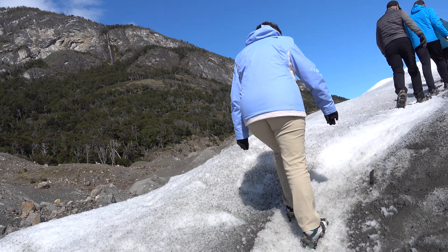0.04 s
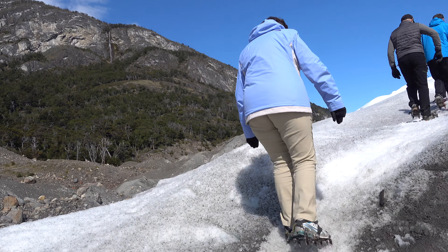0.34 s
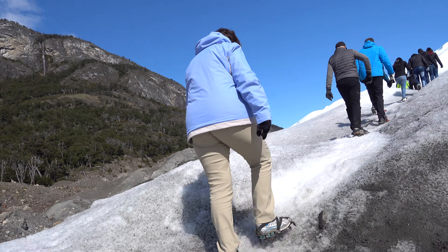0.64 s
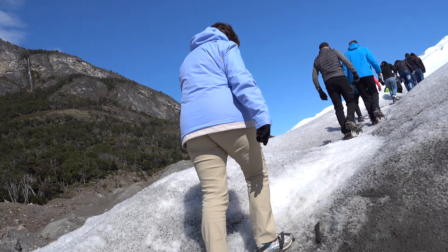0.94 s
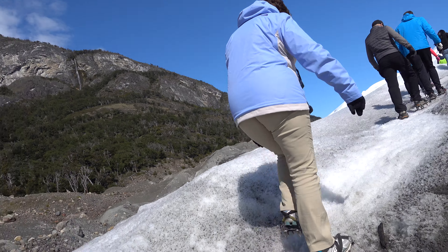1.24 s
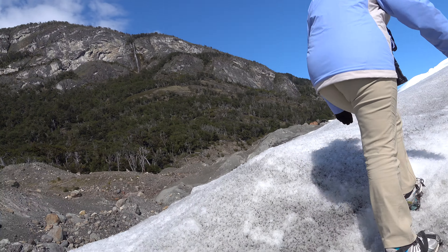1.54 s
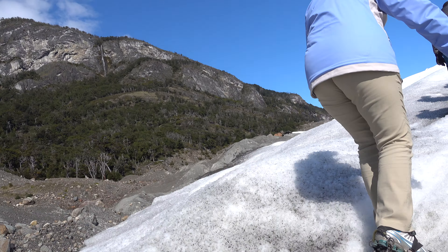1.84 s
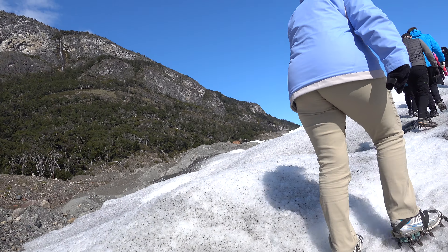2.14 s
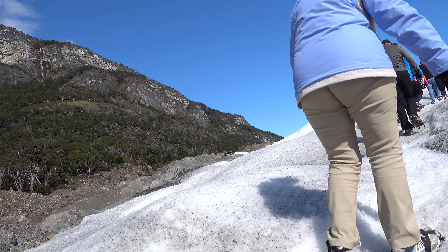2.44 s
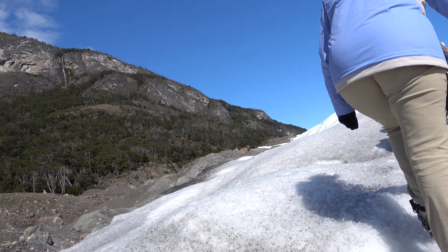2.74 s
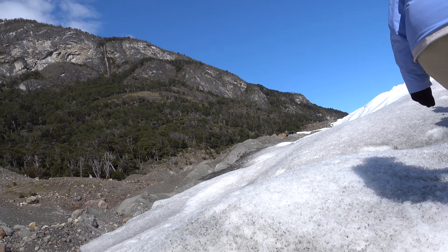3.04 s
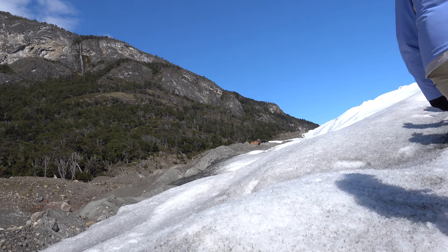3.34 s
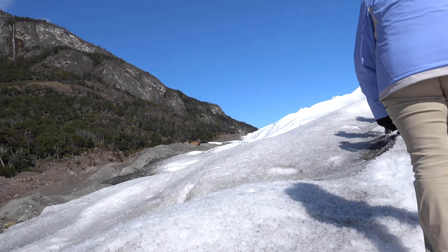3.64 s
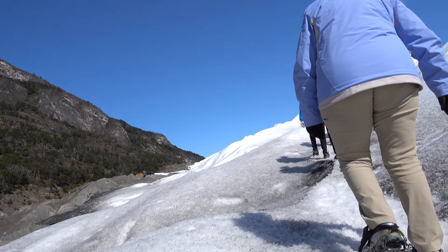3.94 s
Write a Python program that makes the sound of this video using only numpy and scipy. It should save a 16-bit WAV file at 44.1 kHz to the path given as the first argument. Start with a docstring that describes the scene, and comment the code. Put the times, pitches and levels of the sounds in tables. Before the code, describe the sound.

Crunching, scuffing steps of spiked boots climbing an icy slope, with fainter footsteps farther off.

```python
"""Crampons on glacier ice

Walkers climb a slope of coarse ice, close by on the right of a microphone pair in the open air.
Each step is a cluster of spike bites (a dull knock, a crunch, a fizz of crystals) within longer
scuffs of loose grains. Now and then the crust snaps, hollow ice thuds and the steel sings or jingles.
Farther off, the rest of the party patters over a soft hiss of air."""
import sys
import numpy as np
from scipy import signal
from scipy.fft import rfft, irfft
from scipy.io import wavfile
from scipy.ndimage import uniform_filter1d

SR = 44100
rng = np.random.default_rng(int(sys.argv[2]) if len(sys.argv) > 2 else 0)


def store_wav(level_fs):
    """Save 16-bit WAV to argv[1]."""
    pcm = np.round(np.clip(np.atleast_2d(level_fs), -1, 1) * 32767)
    wavfile.write(sys.argv[1], SR, pcm.T.astype(np.int16))


N = 176400

# open air around the microphones: (time [s], level [dB])
AIR_LEVEL = [(0, -45.5), (.55, -47.5), (.75, -44.5), (1.33, -46.5), (1.449, -43), (1.9, -43.5),
             (2.3, -46.5), (2.72, -45.5), (3.35, -43), (3.55, -39), (3.7, -43.5), (4, -39.5)]
# spikes biting the ice close by, levels before each layer's trim:
# (peak time [s], rise [s], decay [s], knock [dB], crunch [dB], fizz [dB], knock pitch [Hz])
BITES = [(0.0479, 0.0073, 0.012, -37.5, -36, -36.5, 630), (0.055, 0.009, 0.011, -39, -49, -44, 640),
         (0.078, 0.0035, 0.0061, -53, -46, -34, 711), (0.1062, 0.0022, 0.0033, -33, -45, -49.4, 730),
         (0.1882, 0.0024, 0.0041, -21, -35, -37, 745), (0.2968, 0.0015, 0.0068, -25.5, -31.5, -36, 635),
         (0.354, 0.0028, 0.0049, -35, -45, -55, 732), (0.372, 0.0074, 0.013, -50, -40.5, -44.5, 785),
         (0.4998, 0.0011, 0.002, -53, -38, -36.5, 480), (0.8766, 0.0097, 0.015, -27, -33.5, -32, 920),
         (0.886, 0.0023, 0.013, -57, -36, -34, 808), (0.926, 0.0047, 0.006, -26, -35, -46, 730),
         (0.9526, 0.0059, 0.0085, -26.5, -28.5, -26.5, 495), (0.963, 0.0076, 0.011, -54, -35, -27, 493),
         (0.985, 0.0027, 0.0041, -32.5, -44, -61, 735), (1.0141, 0.0013, 0.0026, -21, -44, -39, 700),
         (1.0275, 0.0059, 0.0067, -36, -41, -42, 900), (1.085, 0.0022, 0.0074, -32, -65, -34, 685),
         (1.103, 0.0085, 0.0076, -23.5, -27.5, -27.5, 790), (1.163, 0.0027, 0.025, -56, -44.5, -38.5, 694),
         (1.1862, 0.0019, 0.0044, -57, -30.5, -30, 723), (1.2465, 0.0052, 0.019, -56, -50, -39.5, 616),
         (1.469, 0.004, 0.0062, -33.5, -41.5, -44, 690), (1.481, 0.0019, 0.0024, -29.5, -48, -90, 775),
         (1.595, 0.0056, 0.004, -29, -29, -39, 530), (1.6134, 0.01, 0.0038, -30, -31, -33, 690),
         (1.7123, 0.0009, 0.0044, -27, -27, -29, 550), (1.7345, 0.01, 0.014, -43, -38.5, -44, 484),
         (2.005, 0.0027, 0.002, -58, -39, -39, 513), (2.121, 0.0019, 0.0025, -38.5, -55, -51.5, 722),
         (2.396, 0.0022, 0.0049, -31, -53, -31, 1010), (2.4067, 0.001, 0.0022, -45, -28.5, -26, 769),
         (2.4436, 0.0049, 0.0094, -34, -52, -41.5, 606), (2.5215, 0.0058, 0.005, -23.5, -34, -39, 735),
         (2.528, 0.0022, 0.012, -44, -45, -37, 620), (2.5668, 0.0072, 0.011, -31.5, -39.5, -38.5, 575),
         (2.5927, 0.0064, 0.038, -60, -49, -42.5, 577), (2.8992, 0.0087, 0.014, -36.5, -34, -29, 690),
         (2.97, 0.0027, 0.0049, -32, -43, -31.5, 500), (3.0166, 0.0025, 0.031, -38, -37.5, -42, 940),
         (3.069, 0.0039, 0.0076, -60, -30, -38, 892), (3.082, 0.0034, 0.0068, -28, -31, -33, 630),
         (3.0987, 0.0067, 0.0024, -32, -31, -35, 666), (3.208, 0.0067, 0.0068, -31, -31.5, -31.5, 750),
         (3.475, 0.008, 0.02, -39, -49, -43, 510), (3.75, 0.0098, 0.014, -33.5, -32, -29.5, 600),
         (3.817, 0.0054, 0.019, -39, -38, -40.5, 990), (3.9728, 0.0052, 0.0054, -25, -31.9, -37, 657)]
# hollow ice under a boot: (time [s], pitch [Hz], level [dB])
THUDS = [(.048, 773, -26), (0.465, 467, -41), (0.493, 478, -35), (.573, 507, -44), (.68, 422, -42.5),
         (.923, 383, -31.5), (.949, 329, -22.5), (1.1, 218, -24), (1.099, 753, -21), (1.599, 343, -29.5),
         (1.715, 208, -33), (1.902, 760, -41), (1.984, 348, -38.5), (2.095, 387, -39), (2.287, 243, -36),
         (2.522, 515, -26), (2.908, 290, -33), (2.967, 1870, -33.5), (3.206, 970, -28), (3.473, 238, -34.5),
         (3.636, 251, -36), (3.749, 350, -31), (3.973, 343, -27.5)]
# boots dragging through loose grains, levels before each layer's trim:
# (peak time [s], rise [s], decay [s], body [dB], crunch [dB], fizz [dB])
SCUFFS = [(0.0894, 0.049, 0.074, -46.5, -37, -36), (0.1897, 0.027, 0.02, -40, -35.5, -37),
          (0.2472, 0.017, 0.026, -40, -40.5, -43), (0.3024, 0.03, 0.11, -46.5, -44, -42.5),
          (0.628, 0.031, 0.024, -49, -53, -47.5), (0.857, 0.12, 0.35, -54, -44, -37),
          (1.406, 0.031, 0.024, -49, -56, -41.5), (1.5513, 0.093, 0.019, -52.5, -45, -36),
          (1.586, 0.04, 0.033, -38, -35, -35.5), (1.7424, 0.091, 0.28, -61, -45, -43),
          (1.9123, 0.016, 0.15, -74, -59, -45), (2.1026, 0.028, 0.36, -52, -53, -44),
          (2.259, 0.037, 0.0071, -45, -34, -29), (2.291, 0.0097, 0.031, -44.5, -39.5, -32),
          (2.4055, 0.041, 0.075, -44, -40, -37), (2.8842, 0.067, 0.057, -44, -44.5, -37.5),
          (3.0526, 0.048, 0.25, -54.5, -43, -40), (3.6, 0.032, 0.019, -46, -42, -30),
          (3.6373, 0.029, 0.04, -51, -41, -38), (3.858, 0.0061, 0.039, -43, -34, -32.5),
          (3.8996, 0.0073, 0.015, -37.5, -42, -41)]
# spikes rasping through hard crust: (peak time [s], rise [s], decay [s], level [dB])
RASPS = [(.14, 0.017, .02, -44.5), (2.407, 0.0043, 0.008, -27.5), (3.07, 0.026, 0.013, -41),
         (3.61, 0.021, 0.018, -50), (3.825, 0.012, 0.0036, -37.5), (3.858, 0.0027, 0.035, -33.5)]
# dragged spikes singing: (peak time [s], pitch [Hz], level [dB])
SQUEALS = [(.12, 11300, -47), (.205, 8150, -46), (1.02, 1114, -42), (1.395, 12250, -49),
           (1.54, 10000, -39.5), (2.29, 8720, -39.5), (3.65, 7650, -42.5)]
# the crust breaking under a spike: (time [s], pitch [Hz], level [dB])
SNAPS = [(.187, 1000, -21.5), (.2975, 2600, -27), (.4918, 9000, -14.5), (1.1035, 2980, -20),
         (1.1862, 3600, -16), (1.597, 2000, -12), (1.712, 2420, -15), (2.3958, 3500, -15),
         (2.4055, 3400, -17), (2.526, 1200, -22)]
# loose chips of ice ticking: (time [s], pitch [Hz], level [dB])
CHIPS = [(0.513, 3500, -41), (0.547, 4200, -38), (.826, 10000, -25), (.835, 11000, -24),
         (1.63, 4900, -27.5), (2.547, 1010, -33), (2.595, 2020, -30), (3.038, 2500, -26)]
# steel spikes and links jingling: (time [s], pitch [Hz], level [dB])
JINGLES = [(.961, 14500, -25), (1.108, 11650, -30), (1.184, 11340, -40), (1.387, 12300, -42),
           (1.413, 12570, -32.5), (2.002, 12450, -38), (2.843, 13200, -36), (3.097, 11400, -24)]

# hiss of the open glacier: (frequency [Hz], level [dB])
AIR_SPECTRUM = [(60, -55), (110, -38), (200, -5.5), (330, -2.5), (520, 1.5), (850, -3), (1300, -4),
                (2100, -1), (3500, -4.5), (6000, -5.5), (10000, -4.5), (16000, -6.5)]
# ice knocked by a spike: (frequency [ratio to the pitch], level [dB])
KNOCK_SPECTRUM = [(.02, -65), (.06, -56), (.13, -25), (.25, -8.5), (.45, -3), (.75, -0.5), (1.08, 3),
                  (1.55, 0.5), (2.2, -5), (4, -22), (12, -47)]
# crust being crushed: (frequency [Hz], level [dB])
CRUNCH_SPECTRUM = [(100, -39.5), (600, -8), (1100, -6), (1500, -3.5), (2100, 2), (3000, -1.5), (4000, -4.5),
                   (5200, -6.5), (8000, -25), (16000, -44)]
# crystals shattering: (frequency [Hz], level [dB])
FIZZ_SPECTRUM = [(300, -15.5), (2500, -17.5), (4500, 0.5), (6000, -3.5), (7400, -3), (9200, 0),
                 (11500, 3.5), (13500, 2), (16000, -0.5)]
# modes of the steel crampon frame: (frequency [Hz], relative level [dB])
FRAME_MODES = [(3920, -5.5), (5530, -21), (7370, 0), (8200, 1.5), (8800, -1), (9270, 2.5), (9830, 3),
               (10350, 3.5), (11330, 2.5), (12490, 1.5), (14480, -2)]
# low grinding under the sole: (frequency [Hz], level [dB])
BODY_SPECTRUM = [(30, -41), (80, -47), (150, -10.5), (250, -3), (380, 0), (560, -1.5), (780, -1),
                 (1200, -4), (2000, -20.5), (6000, -35)]
# hard crust scraped by a spike: (frequency [Hz], level [dB])
RASP_SPECTRUM = [(300, -17), (900, -9.5), (1700, -4), (2300, -4.5), (3100, 0), (3700, -12), (5500, -33),
                 (12000, -42)]

# shading of the left microphone: (frequency [Hz], left minus right [dB])
LEFT_SHADE = [(200, -0.5), (400, -1), (1000, -4.5), (1600, -6.5), (2800, -8.5), (4000, -9.5), (5000, -14.5),
              (7000, -16), (11000, -16.5), (16000, -19.5)]
# likeness of the two microphones: (frequency [Hz], coherence [0 to 1])
COHERENCE = [(700, 1), (1400, 0.92), (3400, 0.86), (4300, 0.19), (6500, 0.47), (10000, 0.21), (16000, .3)]
# phase between the microphones: (frequency [Hz], left lead [rad])
LEFT_LEAD = [(40, .1), (170, 0.43), (420, 0.85), (700, 1.24), (1500, 1.41), (3600, 1.13), (6400, 1.9),
             (9500, 5.9), (15000, 1.2)]
# treble swaying on the left microphone: (time [s], gain [dB])
TREBLE_SWAY = [(0, -2.5), (.2, 1.5), (.4, 0), (0.752, -2), (1.02, 3), (1.37, 0), (1.6, 2.5), (2.25, -2),
               (2.5, 2), (2.85, -1), (3.1, 2.5), (3.7, -2), (4, 2.5)]


def amp(db):
    """Decibels to gain."""
    return 10 ** (np.asarray(db) / 20)


def unit_rms(x):
    """Scales each row to an rms of one."""
    return x / np.sqrt(np.mean(x ** 2, -1, keepdims=True) + 1e-20)


def read(points, hz):
    """Reads a table along a log-frequency axis."""
    freqs, values = np.transpose(points)
    return np.interp(np.log(hz + 1e-6), np.log(freqs), values)


def fader(points):
    """Gain at every sample from a table of times and decibels."""
    return amp(np.interp(np.arange(N) / SR, *np.transpose(points)))


def add(mix, s, sound):
    """Adds a two-row sound to the mix at time s."""
    at = round(s * SR)
    sound = sound[:, max(-at, 0):]
    part = mix[:, max(at, 0):][:, :sound.shape[1]]
    part += sound[:, :part.shape[1]]


def colour(points, pitch=1, size=4096):
    """Minimum-phase impulse response with the given spectrum, its axis multiplied by pitch."""
    hz = abs(np.fft.fftfreq(size, 1 / SR))
    log_gain = np.log(amp(read(points, hz / pitch)))
    spectrum = np.exp(np.conj(signal.hilbert(log_gain)))
    return np.fft.ifft(spectrum).real[:size // 2]


def ring(hz, width_hz, size=2048):
    """Impulse response of one damped mode."""
    t = np.arange(size) / SR
    return np.exp(-np.pi * width_hz * t) * np.sin(2 * np.pi * hz * t)


def fractures(per_s, spread_db, dust):
    """Tiny cracks of uneven size over a dust of finer ones, in two uncorrelated rows."""
    sizes = amp(spread_db * np.minimum(rng.exponential(1, N), 3))
    breaks = rng.random(N) < per_s / SR
    cracks = sizes * breaks * rng.uniform(-1, 1, (2, N))
    return unit_rms(cracks) + dust * rng.standard_normal((2, N))


def swell(cracks, response, s, rise, decay, db, attack_curve=1.73):
    """Cracks swelling to a peak at s and dying away, heard through a response: (start time, sound)."""
    t = np.arange(-2 * rise, min(5 * decay, 1), 1 / SR)
    envelope = np.exp(np.where(t < 0, -abs(t / rise) ** attack_curve, -t / decay))
    start = s + t[0]
    drive = np.take(cracks, round(start * SR) + np.arange(len(t)), axis=1, mode="wrap") * envelope
    sound = signal.fftconvolve(drive, response[None], axes=1)
    return start, amp(db) * sound * np.linalg.norm(envelope) / np.linalg.norm(sound, axis=1)[:, None]


def air():
    """Soft, slightly gritty hiss of the open glacier."""
    grit = fractures(per_s=1200, spread_db=2.5, dust=1.36)
    hiss = signal.oaconvolve(grit, colour(AIR_SPECTRUM)[None], axes=1)[:, :N]
    return unit_rms(hiss) * fader(AIR_LEVEL)


def far_steps(per_s=20, centre_hz=430, q=1.7, mean_db=-49.5, spread_db=9):
    """The rest of the party, farther off: dull, irregular knocks."""
    out, cracks = np.zeros((2, N)), fractures(per_s=4500, spread_db=4, dust=0.86)
    for k, (jitter, weight, pitch) in enumerate(rng.uniform(-1, 1, (160, 3))):
        s = (k + jitter) / per_s
        if s < N / SR:
            hz = centre_hz * 1.4 ** pitch
            knock = np.diff(ring(hz, hz / q))
            db = mean_db + spread_db * weight
            add(out, *swell(cracks, knock, s, rise=0.0011, decay=0.0064, db=db))
    return out


def clumping(depth_db, samples):
    """Quick random swings of gain as grains give way in groups."""
    drift = uniform_filter1d(uniform_filter1d(rng.standard_normal(N), samples), samples)
    return amp(depth_db * unit_rms(drift))


def splinters(per_s=650, low_hz=1100, high_hz=7000, pitches=14, q=8, db=-5):
    """Larger grains crack one by one, each ringing for a few cycles at its own pitch."""
    out = np.zeros((2, N))
    for hz in np.geomspace(low_hz, high_hz, pitches):
        cracks = fractures(per_s / pitches, spread_db=2, dust=0)
        out += signal.oaconvolve(cracks, hz * ring(hz, hz / q)[None], axes=1)[:, :N]
    return amp(db) * unit_rms(out)


def crystals(frame_db=-4.5, spread_db=4.5, detune=0.02):
    """Response of shattering crystals plus the steel frame, which rings differently at each contact."""
    contact = rng.uniform(-1, 1, (len(FRAME_MODES), 2))
    frame = sum(amp(db + spread_db * force) * ring(hz * (1 + detune * shift), width_hz=150)
                for (hz, db), (force, shift) in zip(FRAME_MODES, contact))
    return unit_rms(colour(FIZZ_SPECTRUM)) + amp(frame_db) * unit_rms(frame)


def bites(knock_trim_db=1, crunch_trim_db=1.5, fizz_trim_db=4):
    """Spikes punch in close by: the ice knocks, its crust crunches and crystals shatter."""
    out, crunch = np.zeros((2, N)), colour(CRUNCH_SPECTRUM)
    deep = fractures(per_s=3000, spread_db=1.5, dust=0.67)
    coarse = fractures(per_s=4000, spread_db=4, dust=0.52)
    fine = fractures(per_s=7000, spread_db=4, dust=0.6)
    clumps = clumping(depth_db=1, samples=90)
    coarse = unit_rms(coarse * clumps) + splinters()
    fine *= clumps
    for s, rise, decay, knock_db, crunch_db, fizz_db, hz in BITES:
        add(out, *swell(deep, colour(KNOCK_SPECTRUM, hz), s, rise, decay, knock_db + knock_trim_db))
        add(out, *swell(coarse, crunch, s, rise, decay, crunch_db + crunch_trim_db))
        add(out, *swell(fine, crystals(), s, rise, decay, fizz_db + fizz_trim_db))
    return out


def thuds(rise_cycles=0.5, decay_s=0.0057):
    """A boot's weight sets one mode of the hollow ice ringing."""
    out, t = np.zeros((2, N)), np.arange(SR // 12) / SR
    for s, hz, db in THUDS:
        envelope = 2 * (1 - np.exp(-t * hz / rise_cycles)) * np.exp(-t / decay_s)
        phase = 2 * np.pi * (hz * t + rng.random((2, 1)))
        add(out, s, amp(db) * envelope * np.sin(phase))
    return out


def scuffs(body_trim_db=2, crunch_trim_db=-1, fizz_trim_db=1.5):
    """Loose grains grind under the sole in clumps and skitter away; dragged spikes rasp."""
    out, body, crunch = np.zeros((2, N)), colour(BODY_SPECTRUM), colour(CRUNCH_SPECTRUM)
    clumps = clumping(depth_db=2.6, samples=130)
    deep = fractures(per_s=500, spread_db=5, dust=0.63)
    coarse = fractures(per_s=1700, spread_db=2, dust=1.37) * clumps
    fine = fractures(per_s=3200, spread_db=3, dust=0.97) * clumps
    coarse = unit_rms(coarse) + splinters()
    for s, rise, decay, body_db, crunch_db, fizz_db in SCUFFS:
        add(out, *swell(deep, body, s, rise, decay, body_db + body_trim_db))
        add(out, *swell(coarse, crunch, s, rise, decay, crunch_db + crunch_trim_db))
        add(out, *swell(fine, crystals(), s, rise, decay, fizz_db + fizz_trim_db))
    for s, rise, decay, db in RASPS:
        add(out, *swell(coarse, colour(RASP_SPECTRUM), s, rise, decay, db))
    return out


def squeals(chatter):
    """A dragged spike chatters and sings in one narrow mode."""
    out = np.zeros((2, N))
    for s, hz, db in SQUEALS:
        add(out, *swell(chatter, ring(hz, width_hz=110), s, rise=0.049, decay=0.046, db=db))
    return out


def snaps(q=1.1, spray_db=-18, spray_decay_s=0.0011):
    """The crust gives way at once: one sharp crack and a brief spray of splinters."""
    out, t = np.zeros((2, N)), np.arange(SR // 100) / SR
    for s, hz, db in SNAPS:
        crack = np.diff(ring(hz, hz / q))
        crack /= abs(crack).max()
        spray = amp(spray_db) * rng.standard_normal((2, len(t))) * np.exp(-t / spray_decay_s)
        add(out, s, amp(db) * signal.fftconvolve((t == 0) + spray, crack[None], axes=1))
    return out


def chips(chatter, q=4):
    """Loose chips of ice tick, each a quickly damped mode."""
    out = np.zeros((2, N))
    for s, hz, db in CHIPS:
        add(out, *swell(chatter, np.diff(ring(hz, hz / q)), s, rise=0.00069, decay=0.00081, db=db))
    return out


def jingles(chatter, width_hz=130, max_split=0.027, partner_db=-18):
    """Steel spikes and links ring: a main mode beats with a close partner on either side."""
    out = np.zeros((2, N))
    for s, hz, db in JINGLES:
        below, above = max_split * rng.uniform(0.5, 1, 2)
        partners = ring(hz * (1 - below), width_hz) + ring(hz * (1 + above), width_hz)
        link = ring(hz, width_hz) + amp(partner_db) * partners
        add(out, *swell(chatter, link, s, rise=0.0051, decay=0.0068, db=db))
    return out


def slope_scatter(direct, db=-16, delay_s=0.003, decay_s=0.012):
    """The uneven ice all around adds a short, faint scatter to the direct sound."""
    t = np.arange(SR // 6) / SR
    tail = rng.standard_normal((2, len(t))) * np.exp(-t / decay_s) * (t > delay_s)
    tail = unit_rms(tail) / np.sqrt(len(t))
    return direct + amp(db) * signal.oaconvolve(direct, tail, axes=1)[:, :N]


def microphones(x):
    """The left side is shaded, phase-shifted and less alike in the treble."""
    hz = np.fft.rfftfreq(N, 1 / SR)
    right, stray = rfft(x)
    coherence = read(COHERENCE, hz)
    left = coherence * right + np.sqrt(1 - coherence ** 2) * stray
    left *= amp(read(LEFT_SHADE, hz)) * np.exp(1j * read(LEFT_LEAD, hz))
    return irfft(np.array([left, right]), N)


def treble_sway(pair, above_hz=980):
    """The left microphone's share of the treble changes from step to step."""
    left, right = pair
    treble = signal.sosfiltfilt(signal.butter(2, above_hz, "high", fs=SR, output="sos"), left)
    return np.array([left + (fader(TREBLE_SWAY) - 1) * treble, right])


def scene():
    """Near steps, far steps and open air, heard from the microphone pair on the slope."""
    near = bites() + snaps() + scuffs()
    chatter = fractures(per_s=3400, spread_db=4, dust=0.24)
    near += jingles(chatter) + thuds() + chips(chatter) + squeals(chatter)
    glacier = slope_scatter(near + far_steps()) + air()
    return treble_sway(microphones(glacier))


def record(dry, low_cut_hz=254, top_hz=16000):
    """The recorder's wind filter and band limit."""
    wind_filter = signal.butter(2, low_cut_hz, "high", fs=SR, output="sos")
    band_limit = signal.firwin(511, top_hz, window=("kaiser", 9), fs=SR)
    return signal.oaconvolve(signal.sosfilt(wind_filter, dry), band_limit[None], "same")


dry = scene()
out = record(dry)
store_wav(out)
```